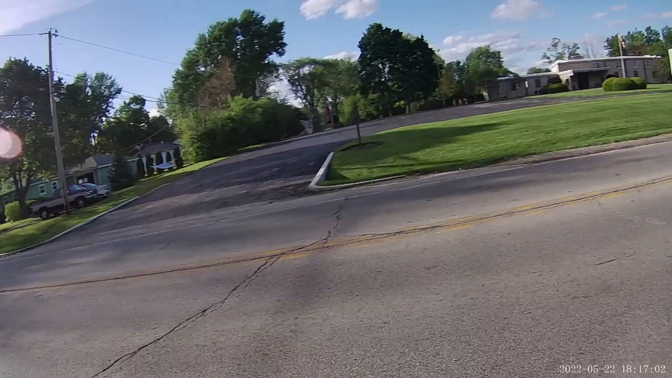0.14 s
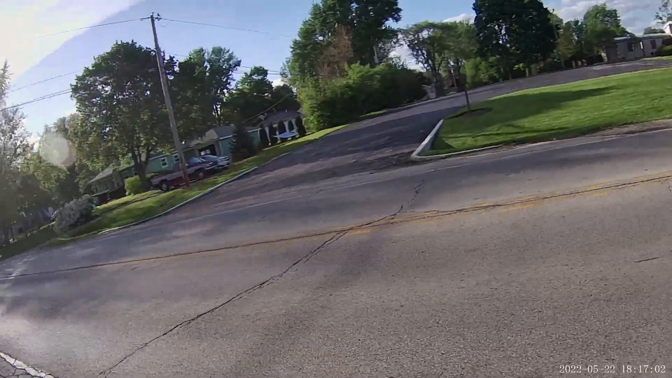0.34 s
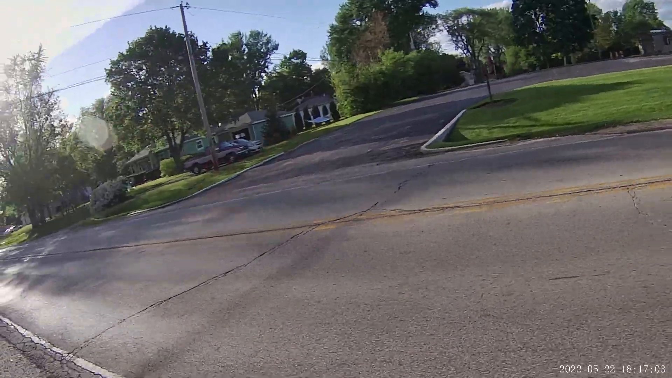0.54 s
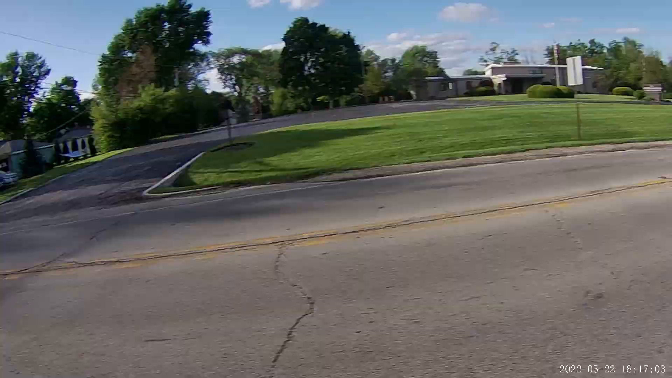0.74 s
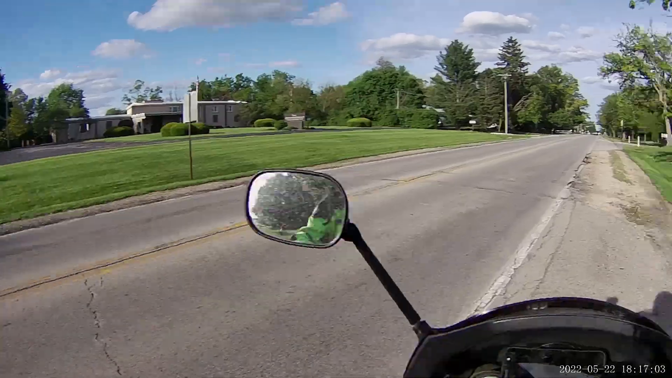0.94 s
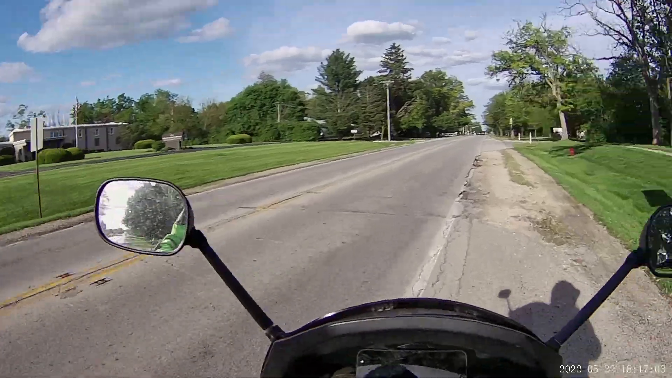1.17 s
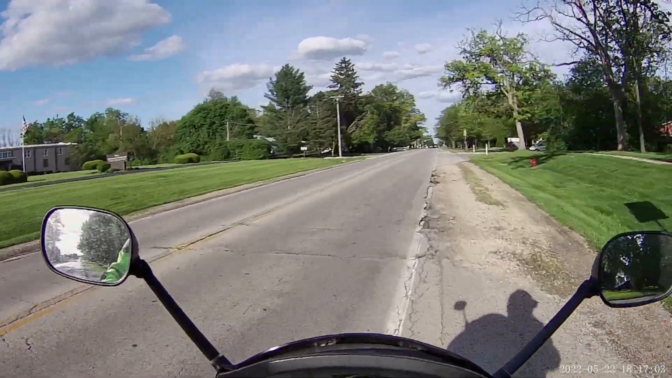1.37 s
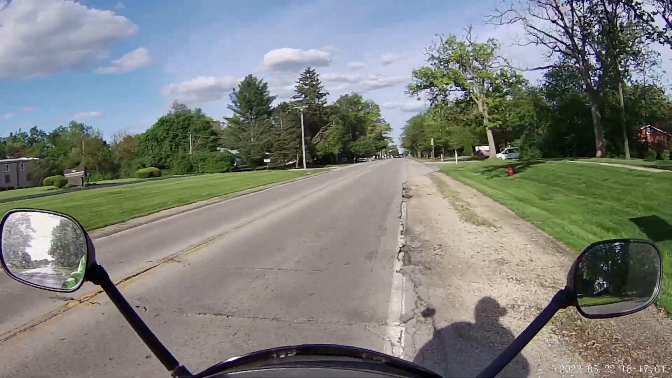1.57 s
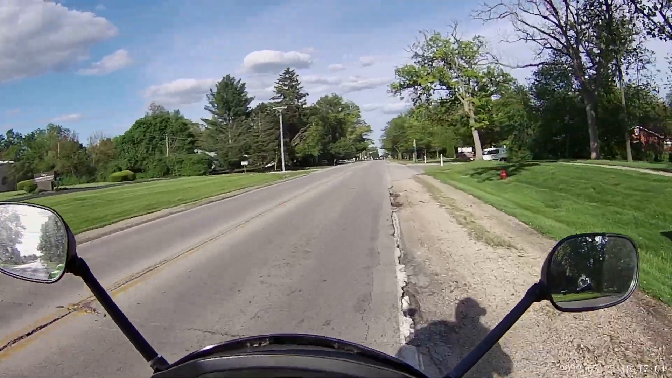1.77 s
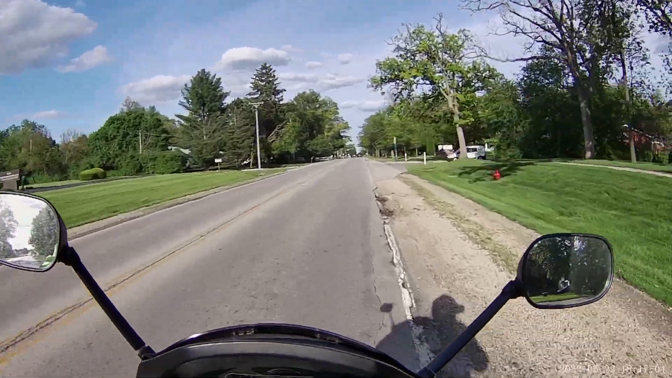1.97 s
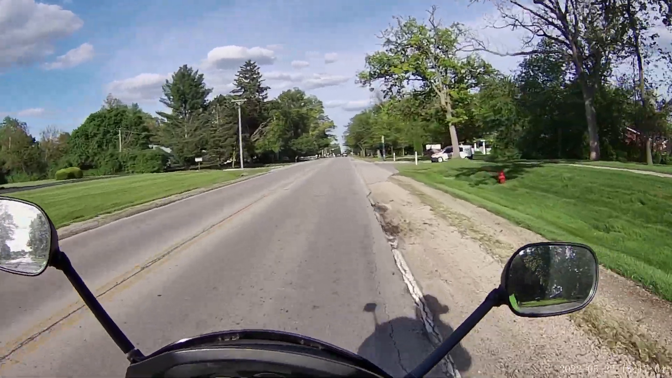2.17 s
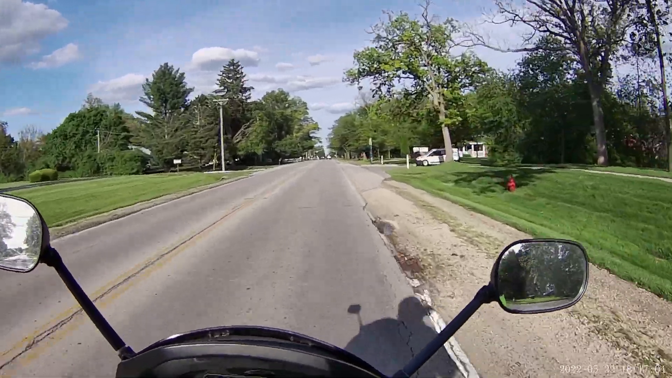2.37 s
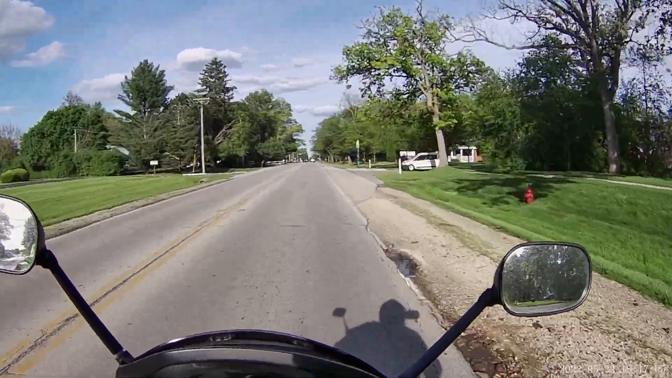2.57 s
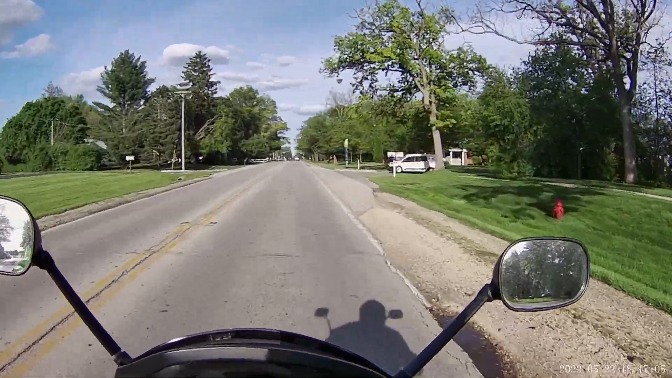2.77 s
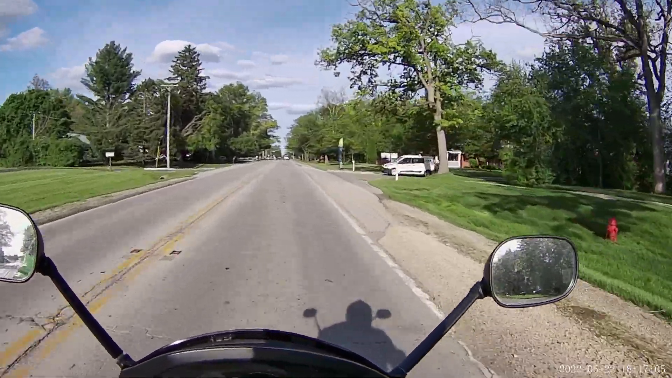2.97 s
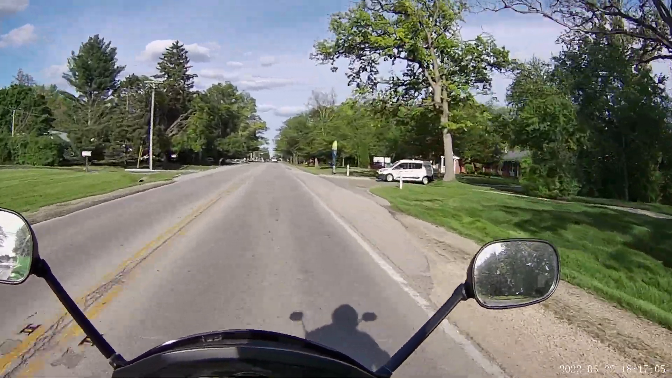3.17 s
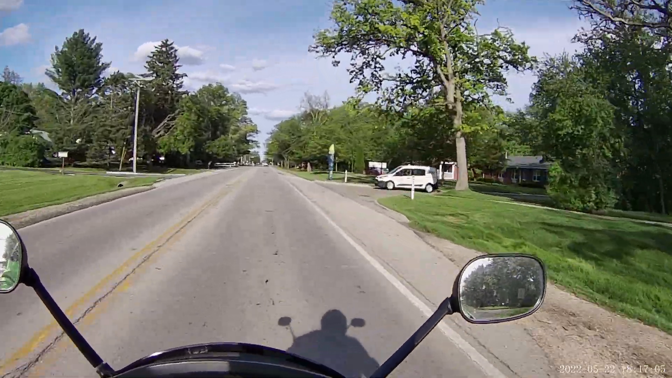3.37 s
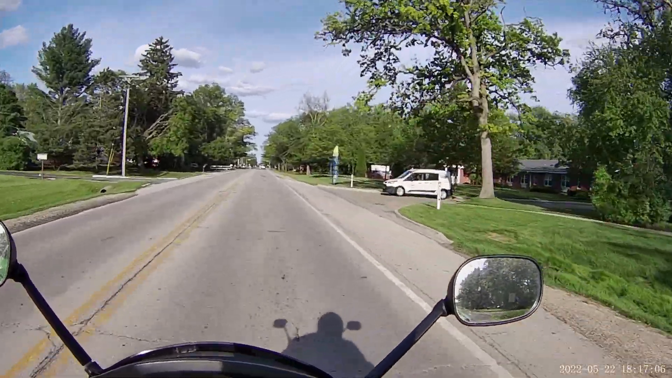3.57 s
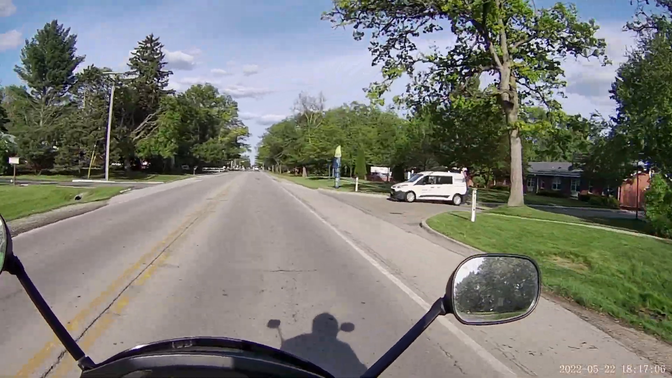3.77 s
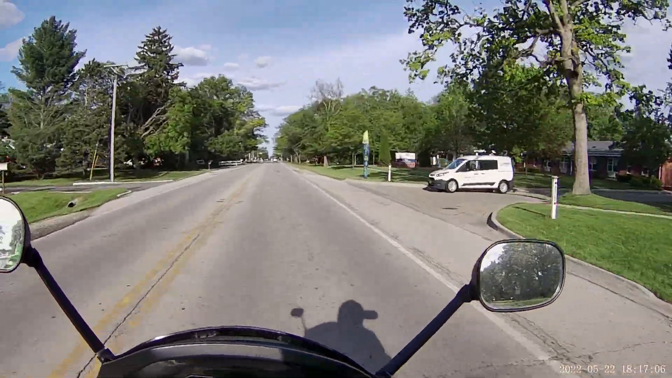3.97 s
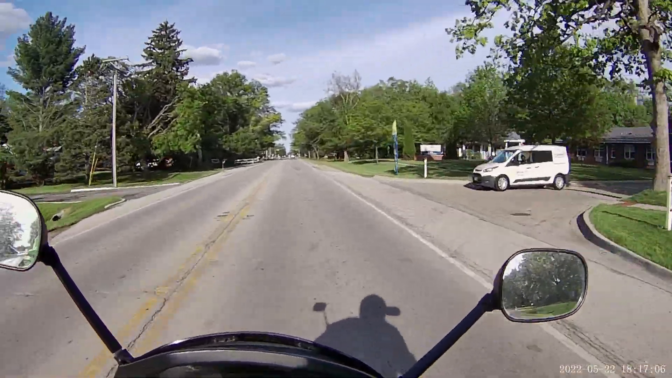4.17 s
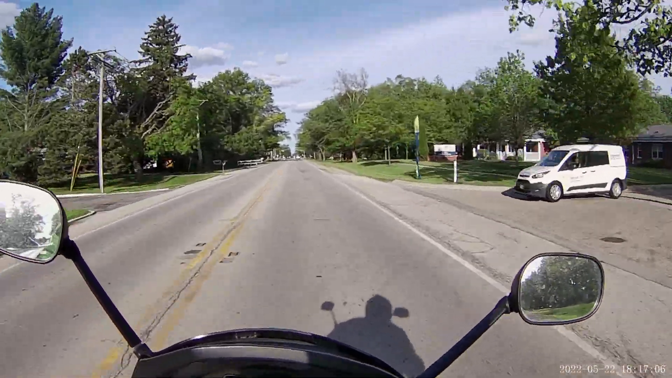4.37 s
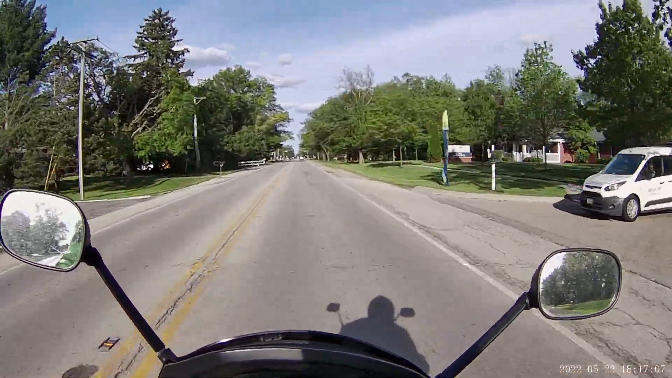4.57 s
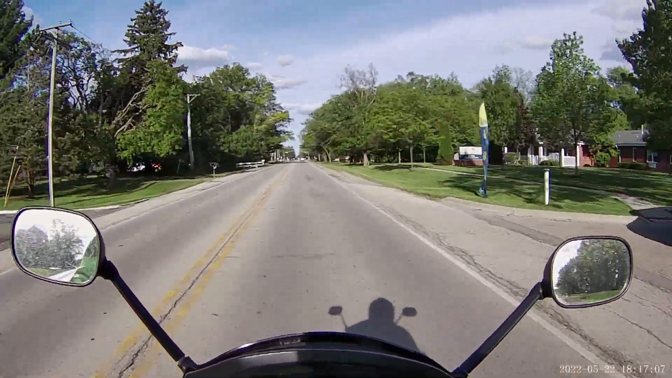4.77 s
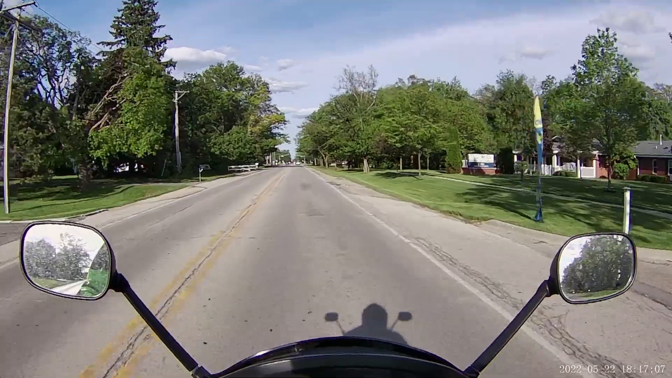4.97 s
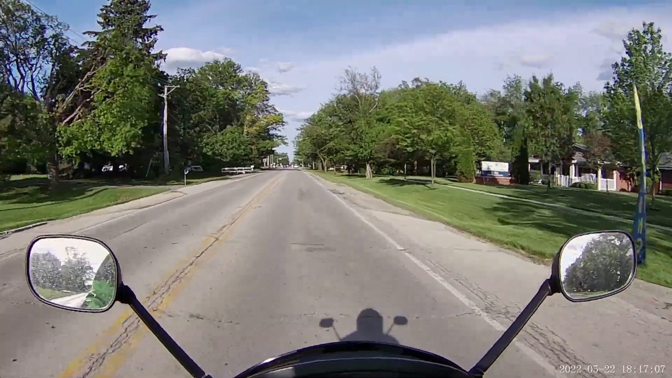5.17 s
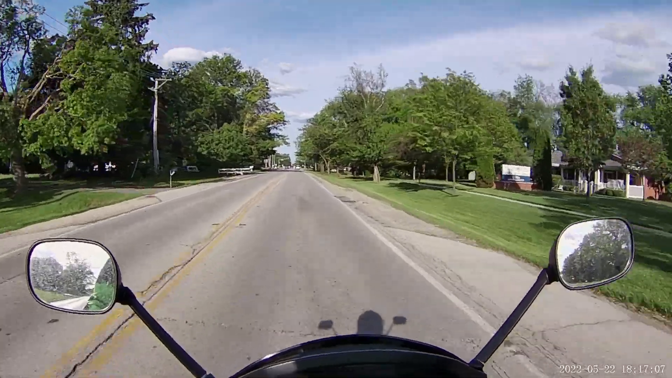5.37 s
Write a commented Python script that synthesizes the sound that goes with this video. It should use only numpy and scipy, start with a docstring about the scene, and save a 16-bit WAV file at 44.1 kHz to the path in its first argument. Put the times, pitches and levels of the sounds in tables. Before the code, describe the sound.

A small twin-cylinder scooter idles quietly and unevenly on an open suburban road, with a few dry helmet ticks. Just before one second the throttle opens with several hard strokes, the engine swells quickly into a barking hum, then its pitch climbs gradually to the end. Low wind stays faint beneath it. The close, muffled helmet microphone dulls the treble.

```python
"""A small scooter engine idles unevenly on a quiet road, with thumps, soft gas rush and a few dry helmet ticks.
Just before one second it pulls away: hard first strokes and soft knocks, then a hum as the clutch bites.
The firing rate climbs to the end; each stroke barks, echoes in a retuning pipe, cracks and thumps.
Low wind grows throughout, with another tick near two seconds and one stronger gust after four.
Struck resonances, noise pulsed by the firings and summed cosines make it, through a muffled helmet microphone."""
import sys
import numpy as np
from scipy import signal
from scipy.fft import rfft, irfft
from scipy.io import wavfile
from scipy.ndimage import uniform_filter1d

SR = 44100
rng = np.random.default_rng(int(sys.argv[2]) if len(sys.argv) > 2 else 0)


def wrap_up_sound(samples):
    """Save the sound to the file named by the first command line argument, as 16-bit audio."""
    columns = np.atleast_2d(samples).T
    # keep every value between -1 and 1, then stretch to whole-number steps
    tamed = np.clip(columns, -1, 1)
    steps = np.round(tamed * 32767).astype(np.int16)
    wavfile.write(sys.argv[1], SR, steps)


N = 239595


def from_db(db):
    """Gain of a level in dB."""
    return 10 ** (np.asarray(db) / 20)


def rms_one(x):
    """Scale the whole sound to unit rms."""
    return x / np.sqrt(np.mean(x ** 2) + 1e-20)


def evened(x, span_s=.1):
    """Hold the short-term rms near one, so that a level curve sets the loudness."""
    span = int(span_s * SR)
    power = uniform_filter1d(uniform_filter1d(x ** 2, span), span)
    return x / np.sqrt(power + 1e-20)


def in_time(rows):
    """Draw each column of a table as a curve, one value a sample."""
    s, *columns = np.transpose(rows)
    return [np.interp(np.arange(N) / SR, s, column) for column in columns]


def butter(x, hz, kind, order=2):
    """Butterworth filter."""
    return signal.sosfilt(signal.butter(order, hz, kind, fs=SR, output="sos"), x)


def clicks(at_s, sizes):
    """Impulses shared between the two nearest samples."""
    out, at = np.full(N + SR, 1e-18), np.asarray(at_s) * SR
    np.add.at(out, at.astype(int), sizes * (1 - at % 1))
    np.add.at(out, at.astype(int) + 1, sizes * (at % 1))
    return out[:N]


def ring(x, hz, width_hz):
    """A resonance: a unit click sets off a dying sine of height 1."""
    radius, angle = np.exp(-np.pi * width_hz / SR), 2 * np.pi * hz / SR
    return signal.lfilter([0, np.sin(angle)], [1, -2 * radius * np.cos(angle), radius * radius], x)


def struck(modes, at_s, level_db, uneven_db, tuning=1, swells=False):
    """Each blow rings every mode at a chance strength, neighbours in opposite sign; swelling rings build first."""
    chance_db = uneven_db * rng.standard_normal((len(at_s), len(modes))).T
    out = np.zeros(N + SR)
    first = (np.asarray(at_s) * SR).astype(int)[:, None] + 1
    for k, (hz, width, db) in enumerate(modes):
        at = first + np.arange(int(2.5 * SR / np.min(width)))
        age = at / SR - np.asarray(at_s)[:, None]
        decay = np.pi * np.reshape(width, (-1, 1)) * age
        envelope = np.exp(-decay) * (decay if swells else 1)
        wave = envelope * np.sin(2 * np.pi * np.reshape(hz * tuning, (-1, 1)) * age)
        strength = (-1) ** k * from_db(level_db + db + chance_db[k])[:, None]
        out += np.bincount(at.ravel(), (strength * wave).ravel(), N + SR)
    return out[:N]


def coloured(spectrum):
    """Noise with a given spectrum, at unit rms."""
    hz, db = np.transpose(spectrum)
    grid = np.arange(1, N // 2 + 2) * SR / N
    shape = from_db(np.interp(np.log(grid), np.log(hz), db))
    return rms_one(irfft(rfft(rng.standard_normal(N)) * shape, N))


# crankshaft speed: (time [s], firing rate [Hz])
CRANK_SPEED = [(0.0, 46.13), (0.164, 47.5), (0.844, 47.92), (0.939, 49.94), (1.007, 54.88), (1.184, 62.63),
               (1.26, 63.98), (1.406, 64.72), (1.575, 63.63), (1.831, 70.54), (2.073, 75.46),
               (2.306, 75.99), (2.467, 74.62), (2.661, 74.37), (3.387, 79.3), (4.07, 85.25), (4.462, 87.9),
               (5.018, 90.37), (5.43, 91.48)]
# how hard the engine works: (time [s], level [dB], throttle [0 idle, .5 part, 1 wide open])
ENGINE_LOAD = [(0, -43.5, 0.031), (.55, -40, 0.097), (.86, -39.5, 0.13), (.96, -34.5, 0.2),
               (1.04, -30, 0.46), (1.13, -31.5, 1), (1.28, -28.5, 0.86), (1.62, -28, 0.5), (2.1, -29, 0.4),
               (2.9, -28, 0.37), (3.6, -27.5, 0.38), (4.2, -25.5, 0.76), (4.7, -25, 0.78),
               (5.43, -25, 0.63)]
# the pipes retune as the gas heats: (time [s], bark note [Hz], its width [Hz], its level against the engine [dB],
# its echo [dB], pipe pitch [ratio], silencer pitch [ratio])
PIPE_TUNING = [(0, 1160, 560, -21.5, -18.5, 1, 0.93), (0.9, 1130, 520, -15.5, -1, 0.93, 0.98),
               (1.0, 1090, 350, -10.5, 5, 1.2, 1.125), (1.07, 1200, 350, -6.5, -6, 0.96, 0.98),
               (1.15, 1216, 279, 0, -10, 1.054, 0.967), (1.35, 1210, 303, -4, -7.5, 1.006, 0.96),
               (1.6, 1240, 440, -8.5, -6, 0.98, 0.99), (1.9, 1280, 520, -6, -4, 0.98, 0.99),
               (2.3, 1190, 520, -4, -6, 1.02, 1.05), (2.8, 1184, 520, -5.5, 1, 0.97, 1.035),
               (3.3, 1194, 520, -4.5, 0, 0.982, 1.1), (3.7, 1140, 520, -5, 0, 1.06, 1.02),
               (4.1, 1140, 520, -5, -2, 1.006, 1.13), (4.6, 1210, 520, -5.5, 2, 0.94, 1.14),
               (5.0, 1250, 520, -7, -2.5, 1.05, 1.04), (5.43, 1205, 520, -2, -5, 1.017, 0.98)]
IDLE_HZ = 48
LOADED_FROM_HZ, LOADED_OVER_HZ = 52.5, 10.5   # the clutch bites over this span of firing rate
UNEVEN_IDLE_DB, UNEVEN_LOAD_DB = 3.2, .6   # firing-to-firing spread


def crank():
    """The turning crank sets the firing times; curves of speed, load and pipe tuning go with it."""
    run = {"t": np.arange(N) / SR}
    run["rate"], = in_time(CRANK_SPEED)
    run["level_db"], run["throttle"] = in_time(ENGINE_LOAD)
    run["loaded"] = np.clip((run["rate"] - LOADED_FROM_HZ) / LOADED_OVER_HZ, 0, 1)
    run["faster"] = run["rate"] - IDLE_HZ
    run["turns"] = .29 + np.cumsum(run["rate"]) / SR   # counted in firings
    fired = np.interp(np.arange(1, int(run["turns"][-1]) + 1), run["turns"], run["t"])
    run["fired"] = fired + 15e-6 * rng.standard_normal(len(fired))   # jitter [s]
    spread_db = UNEVEN_IDLE_DB + (UNEVEN_LOAD_DB - UNEVEN_IDLE_DB) * np.clip(2 * run["throttle"], 0, 1)
    run["uneven_db"] = at_firings(run, spread_db)
    note_hz, width, run["note_db"], echo_db, pipe, silencer = in_time(PIPE_TUNING)
    run["note_hz"], run["note_width"] = at_firings(run, note_hz), at_firings(run, width)
    run["echo_db"] = at_firings(run, echo_db)
    run["pipe"], run["silencer"] = at_firings(run, pipe), at_firings(run, silencer)
    return run


def at_firings(run, curve):
    """Read a curve at each firing."""
    return np.interp(run["fired"], run["t"], curve)


# arrival after the firing, per layer: (at idle [ms], under load [ms], more per Hz above idle [ms/Hz])
ARRIVALS = {"bark": (-0.05, 1.17, -0.037), "return": (-0.2, 1.5, -0.04522), "thump": (-3.8, 0.9, 0.02),
            "crack": (1.18, 3.7, -0.1), "puff": (0.1, 0.35, -0.016), "late puff": (7.1, 7.1, -0.026)}


def arrival(run, layer):
    """Times at which a layer follows the firings; the delay shifts with load and speed."""
    idle, load, slope = ARRIVALS[layer]
    delay_ms = idle + (load - idle) * run["loaded"] + slope * run["faster"]
    return run["fired"] + at_firings(run, delay_ms) / 1000


# mix against the engine level, per layer: (idle [dB], part throttle [dB], wide open [dB],
# more per Hz of firing rate above idle [dB/Hz])
LAYER_MIX = {"thump": (-1.5, -3.5, 3, -0.5447), "return": (-15, -9, -12, 0.1585),
             "bark": (-30, -19, -15.5, 0.0639), "puff": (-23.5, -7.5, -9.5, -0.0874),
             "crack": (-31, -28.5, -19, 0.2955), "rush": (-6, -12, -10.5, 0.1298),
             "rasp": (-30.5, -25.5, -17.5, -0.028), "clack": (-23, -26.5, -32, -0.4664)}


def fader(run, layer):
    """Gain curve of a layer, riding on engine level, throttle and speed."""
    *throttle_db, per_hz = LAYER_MIX[layer]
    mix_db = np.interp(run["throttle"], [0, .5, 1], throttle_db) + per_hz * run["faster"]
    return from_db(run["level_db"] + mix_db)


# silencer resonances: (frequency [Hz], width [Hz], level [dB])
SILENCER_MODES = [(290.7, 51.6, -0.5), (334, 66, 2.5), (449.4, 56, -5)]
SURGE_S, SURGE_WIDTH_S, SURGE_DB = 0.98, 0.11, 3.5   # the thump swells while the engine pulls against the clutch


def thump(run):
    """Each firing rings the low resonances of the silencer."""
    body = struck(SILENCER_MODES, arrival(run, "thump"), 0, .6, run["silencer"])
    surge = from_db(SURGE_DB * np.exp(-((run["t"] - SURGE_S) / SURGE_WIDTH_S) ** 2))
    return surge * fader(run, "thump") * evened(butter(body, 900, "low"))


TWIN_DB_PER_HZ, TWIN_MS_PER_HZ = .03, .0008   # per Hz above idle


def twin_barks(run):
    """One cylinder's note is harder and its barks sooner than the other's, more so above idle."""
    twin = at_firings(run, run["faster"]) * (-1) ** np.arange(len(run["fired"]))
    return arrival(run, "bark") - TWIN_MS_PER_HZ * twin / 1000, TWIN_DB_PER_HZ * twin


# fixed bark resonances: (frequency [Hz], width [Hz], level [dB])
BARK_MODES = [(1200, 120, -6.5), (1507, 34, -9.5)]
BARK_ECHO_MS = 3.16


def bark(run, barked, twin_db):
    """Firings ring fixed resonances and a retuning, swelling pipe note with one echo."""
    uneven_db = run["uneven_db"]
    fixed = butter(struck(BARK_MODES, barked, 0, uneven_db), 1800, "low")
    direct = [(run["note_hz"], run["note_width"], 0)]
    echo = [(run["note_hz"], run["note_width"], run["echo_db"])]
    note = struck(direct, barked, twin_db, uneven_db, swells=True)
    note += struck(echo, barked + BARK_ECHO_MS / 1000, twin_db, uneven_db, swells=True)
    note_gain = from_db(run["level_db"] + run["note_db"])
    return fader(run, "bark") * evened(fixed) + note_gain * evened(note)


# a hard edge on the idling strokes: (frequency [Hz], width [Hz], level [dB])
CLACK_MODES = [(1640, 160, -5), (2950, 260, -4)]


def clack(run, barked):
    """Very uneven blows ring two high resonances with the bark."""
    edge = struck(CLACK_MODES, barked, 0, run["uneven_db"] + 3.5)
    return fader(run, "clack") * rms_one(butter(edge, [1200, 3000], "band"))


# dull puff: (frequency [Hz], width [Hz], level [dB])
PUFF_MODES = [(557.5, 395, 0)]
EARLY_PUFF_DB, IDLE_PUFF_LOSS_DB = 1, 16   # the early puff is this much weaker until the clutch bites


def puff(run):
    """A dull swelling resonance sounds near the bark and again well after it."""
    early_db = EARLY_PUFF_DB - IDLE_PUFF_LOSS_DB * (1 - at_firings(run, run["loaded"]))
    puffs = struck(PUFF_MODES, arrival(run, "puff"), early_db, run["uneven_db"], swells=True)
    puffs += struck(PUFF_MODES, arrival(run, "late puff"), 0, run["uneven_db"], swells=True)
    return fader(run, "puff") * evened(puffs)


# pipe drone: (frequency [Hz], width [Hz], level [dB])
DRONE_MODES = [(420, 28, -11), (633, 43, 2), (994, 46.7, 0), (1563, 46, -1.5)]
ROUND_TRIP_MS, ROUND_TRIP_DB = 3.322, -1.5


def pipe_return(run):
    """The pulse runs up and down the pipe, ringing it again more weakly on the next round."""
    returned, again = arrival(run, "return"), arrival(run, "return") + ROUND_TRIP_MS / 1000
    drone = struck(DRONE_MODES, returned, 0, run["uneven_db"], run["pipe"])
    drone += struck(DRONE_MODES, again, ROUND_TRIP_DB, run["uneven_db"], run["pipe"])
    return fader(run, "return") * evened(butter(drone, 1900, "low"))


# pipe-end crack: (frequency [Hz], width [Hz], level [dB])
CRACK_MODES = [(2058, 100, 1), (2500, 180, -1.5), (2610, 120, -8), (3070, 62, -9), (3280, 95, -14),
               (1407.5, 21, -2.5)]


def crack(run, cracked):
    """The pulse rings a cluster of bright resonances at the pipe end."""
    bright = struck(CRACK_MODES, cracked, 0, run["uneven_db"])
    return fader(run, "crack") * evened(butter(bright, 3800, "low"))


def stroke_envelope(at_s, steady, dies_ms, rises_ms=1.0):
    """An envelope that swells quickly at each stroke and dies away to a steady share."""
    jumps = clicks(at_s, from_db(rng.normal(0, 1.5, len(at_s))))
    rise = np.exp(-1000 / (rises_ms * SR))
    fall = np.exp(-1000 / (dies_ms * SR))
    return steady + signal.lfilter([1 - rise], np.convolve([1, -rise], [1, -fall]), jumps)


STEADY_LOW, STEADY_FROM_HZ, STEADY_PER_HZ = .27, 63, .023


def steady_share(run):
    """The share of gas flow between firings grows with speed."""
    return STEADY_LOW + STEADY_PER_HZ * np.maximum(run["rate"] - STEADY_FROM_HZ, 0)


# gas rush spectrum: (frequency [Hz], density [dB per Hz])
RUSH_SPECTRUM = [(59, -59.5), (100, -26), (240, -18.5), (564, -4.5), (604, -12.5), (705, -3.5), (950, -6.5),
                 (1300, -3), (1840, -13), (3080, -22), (6000, -54), (7800, -76.5), (13200, -120)]
IDLE_DULL_HZ = 1900   # a closing throttle thins the treble above this


def gas_rush(run, barked):
    """Gas noise pulses with each stroke and brightens as the throttle opens."""
    flow = coloured(RUSH_SPECTRUM)
    dull = butter(flow, IDLE_DULL_HZ, "low")
    flow = dull + np.clip(2 * run["throttle"], .4, 1) * (flow - dull)
    return fader(run, "rush") * evened(stroke_envelope(barked, steady_share(run), dies_ms=5.5) * flow)


# gas jet resonances: (frequency [Hz], width [Hz], level [dB])
JET_MODES = [(3080, 230, 5.5), (3655, 92, -6.5), (4760, 1500, -2)]
IDLE_JET_STEADY = 0.087   # extra steady share, so the jet pauses less at idle


def jet_rasp(run, cracked):
    """Noise rings the resonances of the gas jet and bursts with each crack."""
    jet = np.zeros(N)
    for hz, width, db in JET_MODES:
        jet += from_db(db) * rms_one(ring(rng.standard_normal(N), hz, width))
    jet = butter(jet, 2600, "high")
    steady = .6 * steady_share(run) - .08 + IDLE_JET_STEADY * (1 - run["loaded"])
    return fader(run, "rasp") * evened(stroke_envelope(cracked, steady, dies_ms=3.2) * jet)


WIND_DB, WIND_DB_PER_S = -92, 4.5   # at the start; grows as road speed builds
GUST_S, GUST_WIDTH_S, GUST_DB = 4.3, .3, 6.5   # one stronger gust


def wind():
    """Lumpy low pressure noise on the microphone port."""
    t = np.arange(N) / SR
    lumps = from_db(5.1 * rms_one(butter(rng.standard_normal(N), 6.3, "low")))
    level_db = WIND_DB + WIND_DB_PER_S * t + GUST_DB * np.exp(-((t - GUST_S) / GUST_WIDTH_S) ** 2)
    return from_db(level_db) * rms_one(lumps * butter(rng.standard_normal(N), [55, 130], "band"))


# helmet ticks: (time [s], level [dB])
HELMET_TICKS = [(0.067, -41.5), (0.138, -50.5), (0.474, -46), (1.908, -45)]
# helmet shell resonances: (frequency [Hz], width [Hz], level [dB])
SHELL_MODES = [(1620, 300, 10), (3190, 250, 7.5), (4840, 2700, 7.5)]


def helmet_ticks():
    """Dry ticks ring the helmet shell."""
    s, db = np.transpose(HELMET_TICKS)
    return struck(SHELL_MODES, s, db, uneven_db=.6)


# first hard strokes as the throttle opens: (time [s], strength [dB])
FIRST_STROKES = [(0.899, -28.5), (0.938, -20), (0.959, -22), (0.996, -26), (1.015, -31)]
# their resonances: (frequency [Hz], width [Hz], level [dB])
STROKE_MODES = [(1650, 280, -0.5), (2240, 490, -8)]


def first_strokes():
    """Single hard strokes ring two broad resonances that swell before they die."""
    s, db = np.transpose(FIRST_STROKES)
    return struck(STROKE_MODES, s, db, uneven_db=.6, swells=True)


# soft knocks on the mount: (time [s], level [dB])
MOUNT_KNOCKS = [(0.935, -66), (0.995, -62), (1.216, -64)]
# mount resonance: (frequency [Hz], width [Hz], level [dB])
MOUNT_MODES = [(49.6, 51, 18)]


def mount_knocks():
    """Dull knocks ring the mount at a low pitch."""
    s, db = np.transpose(MOUNT_KNOCKS)
    return struck(MOUNT_MODES, s, db, uneven_db=.6)


# silencer's shaping of the hum: (frequency [Hz], level against the engine [dB])
HUM_SHAPE = [(125, -39), (152, -31), (185, -28), (222, -19), (243, -27), (268, -12.5), (298, -15),
             (322, -9.5), (340, -7), (372, -22), (400, -15), (430, -12), (455, -10)]


def hum(run):
    """Under load the thumps merge into low multiples of the firing rate, shaped by the silencer."""
    hz, db = np.transpose(HUM_SHAPE)
    tones = np.zeros(N)
    for k in range(2, 6):
        level_db = run["level_db"] + np.interp(np.log(k * run["rate"]), np.log(hz), db)
        tones += np.sqrt(2) * from_db(level_db) * np.cos(2 * np.pi * k * (run["turns"] - .12))
    return run["loaded"] * tones


def engine():
    """Firing pulses lose their deepest bass; the hum and the gas noise join them."""
    run = crank()
    barked, twin_db = twin_barks(run)
    cracked = arrival(run, "crack")
    pulses = thump(run) - bark(run, barked, twin_db) + clack(run, barked) - puff(run)
    pulses += pipe_return(run) + crack(run, cracked) + first_strokes()
    gas = gas_rush(run, barked) + jet_rasp(run, cracked)
    return butter(pulses, 173, "high", order=4) + gas + hum(run)


def scene():
    """Everything that reaches the microphone."""
    return (engine() + wind() + helmet_ticks() + mount_knocks())[None]


HISS_DB, CUTOFF_HZ = -76, 16300


def record(dry):
    """The housing dulls the treble, the deepest bass is filtered off, the electronics hiss, the top is cut."""
    dulled = butter(butter(dry, 4840, "low", order=6), 90, "high", order=2)
    hiss = from_db(HISS_DB) * rng.standard_normal(dry.shape)
    return signal.sosfilt(signal.cheby2(16, 70, CUTOFF_HZ, fs=SR, output="sos"), dulled + hiss)


dry = scene()
out = record(dry)
wrap_up_sound(out)
```